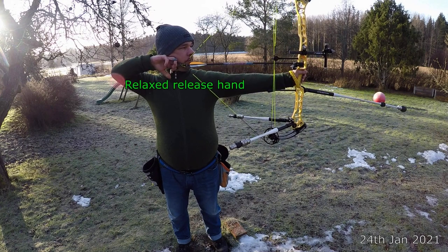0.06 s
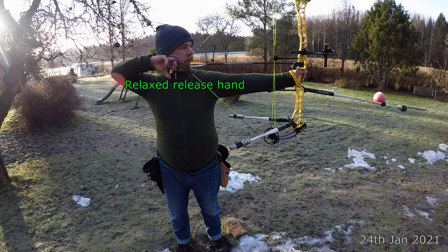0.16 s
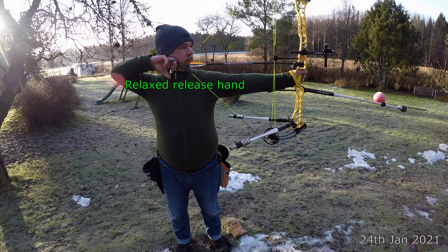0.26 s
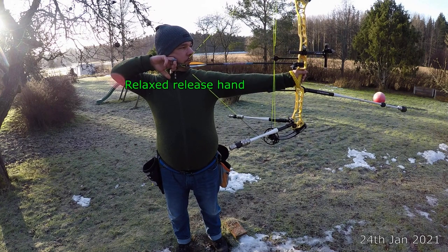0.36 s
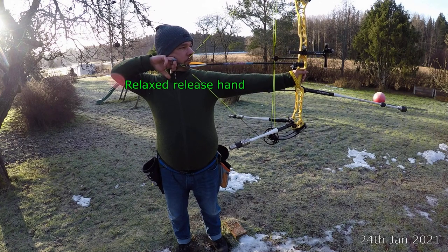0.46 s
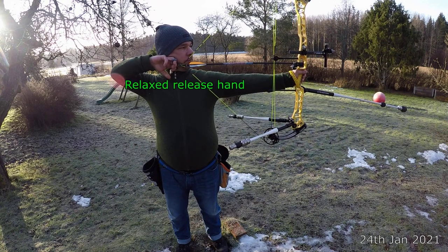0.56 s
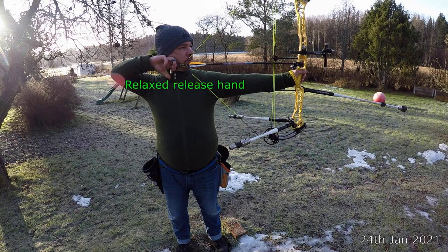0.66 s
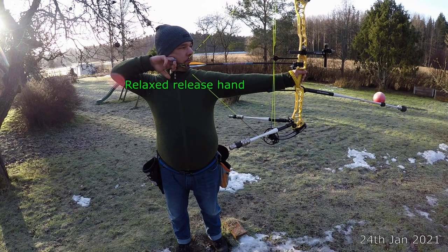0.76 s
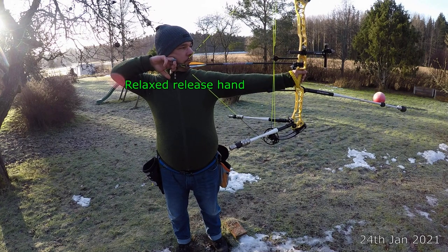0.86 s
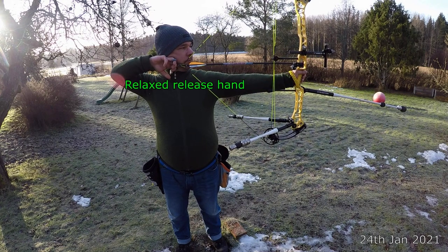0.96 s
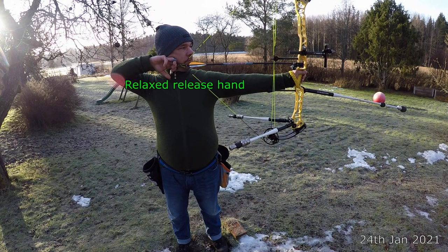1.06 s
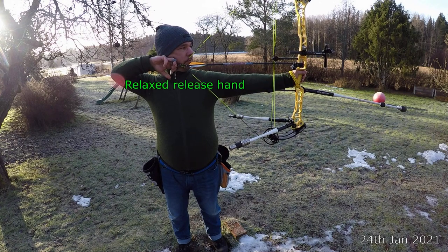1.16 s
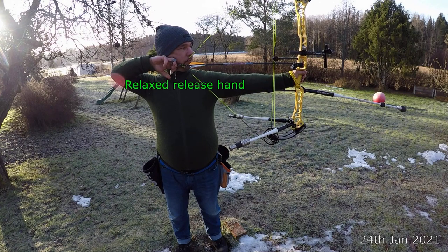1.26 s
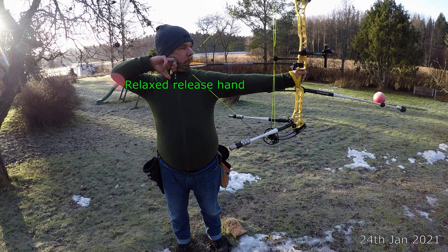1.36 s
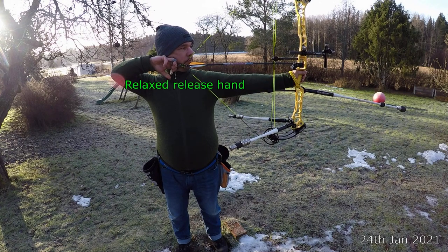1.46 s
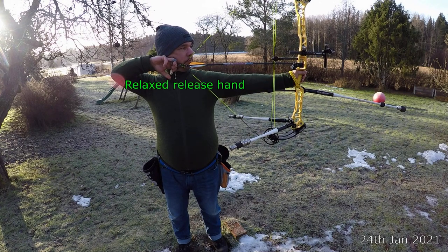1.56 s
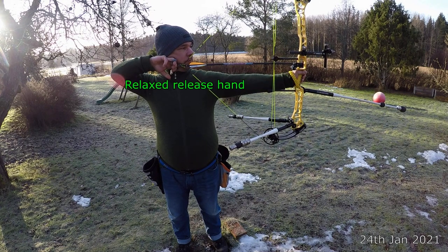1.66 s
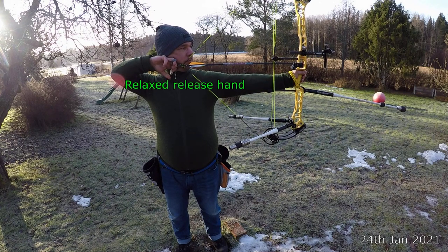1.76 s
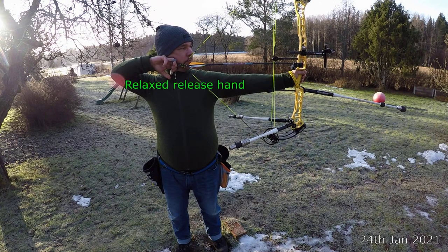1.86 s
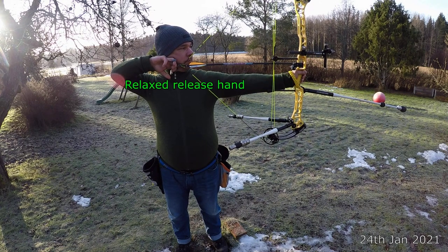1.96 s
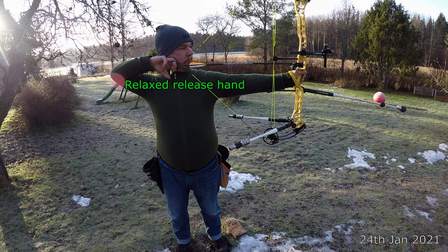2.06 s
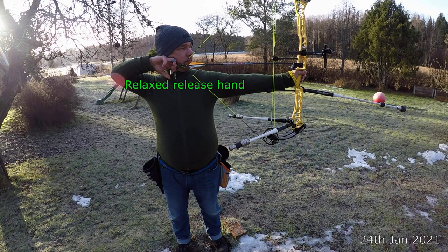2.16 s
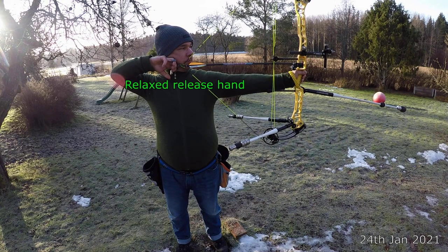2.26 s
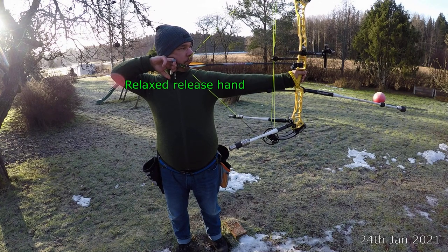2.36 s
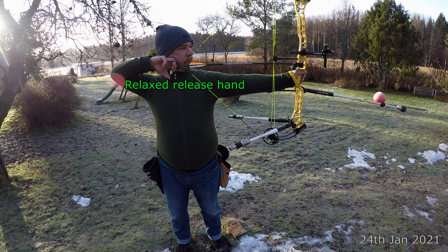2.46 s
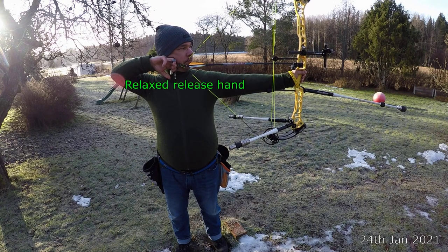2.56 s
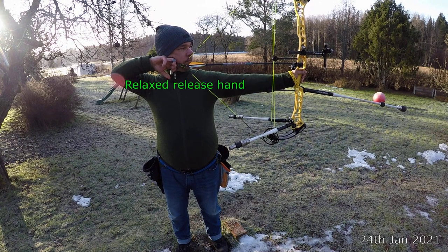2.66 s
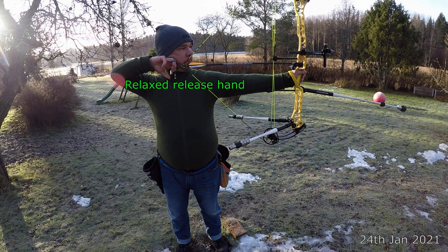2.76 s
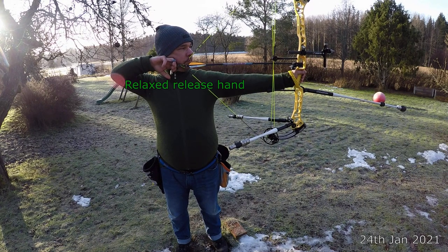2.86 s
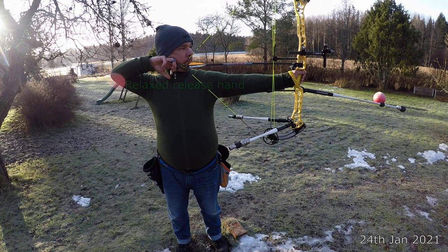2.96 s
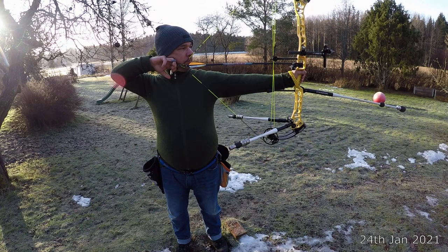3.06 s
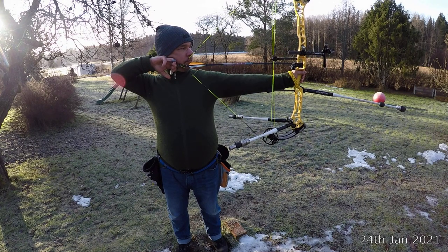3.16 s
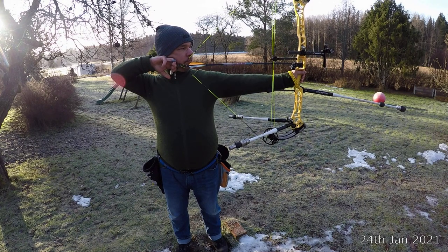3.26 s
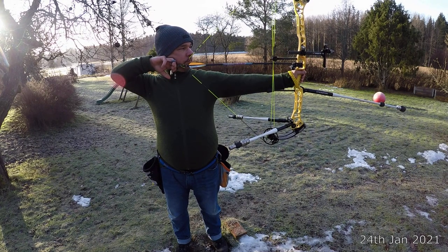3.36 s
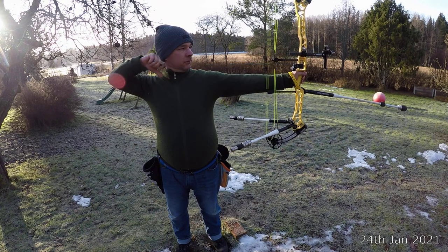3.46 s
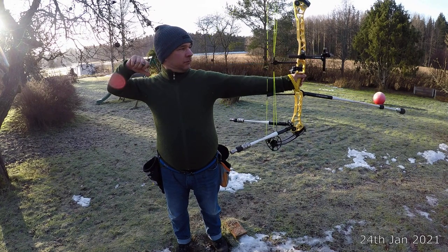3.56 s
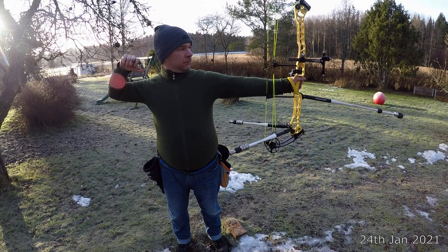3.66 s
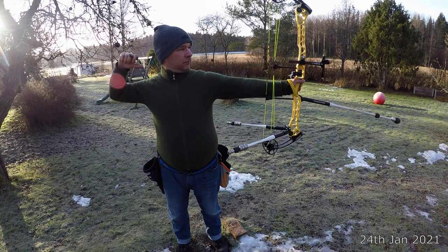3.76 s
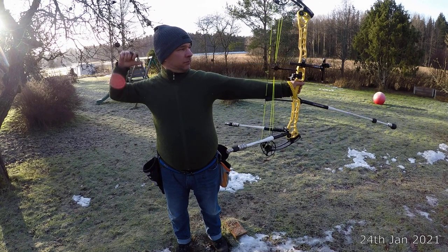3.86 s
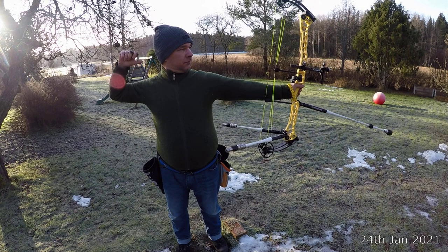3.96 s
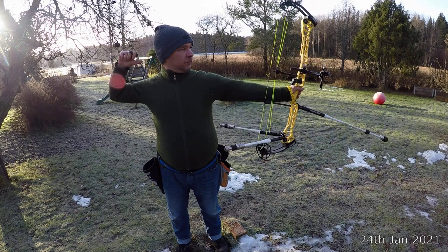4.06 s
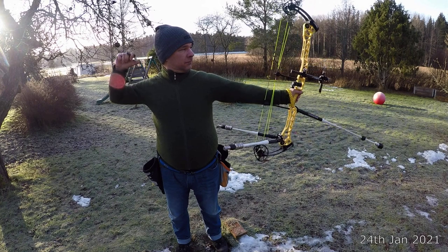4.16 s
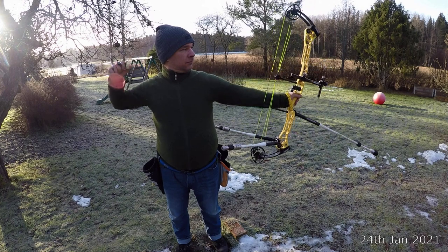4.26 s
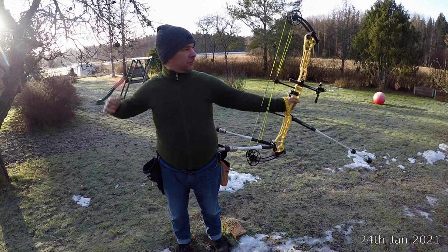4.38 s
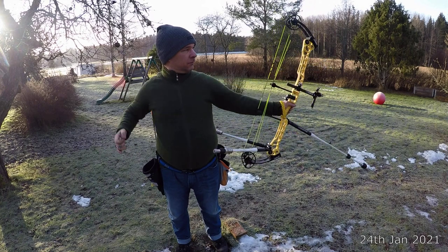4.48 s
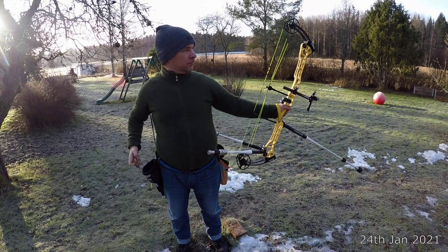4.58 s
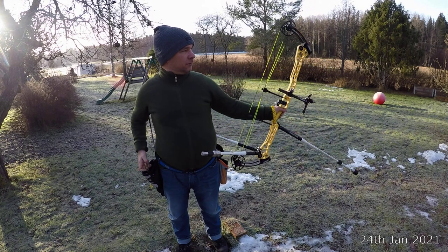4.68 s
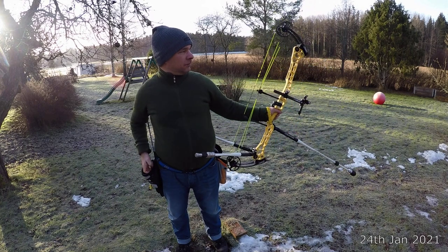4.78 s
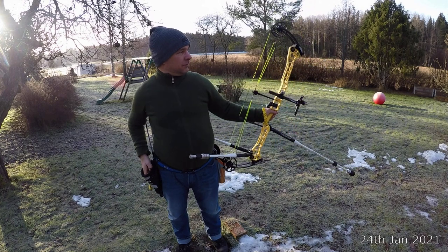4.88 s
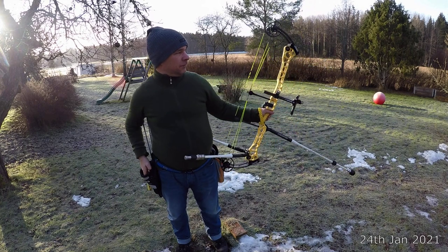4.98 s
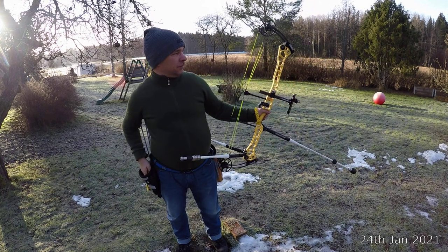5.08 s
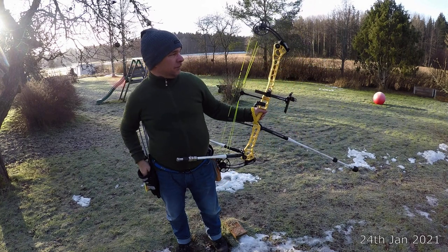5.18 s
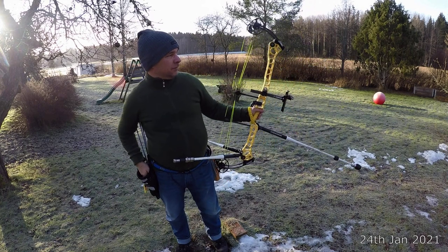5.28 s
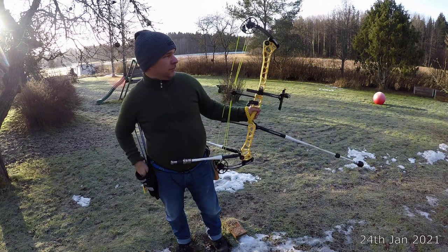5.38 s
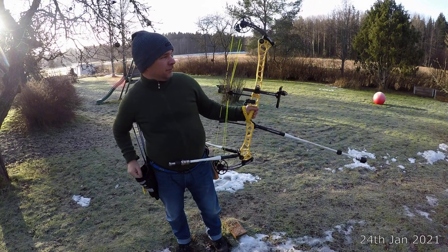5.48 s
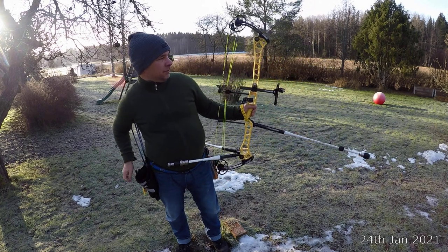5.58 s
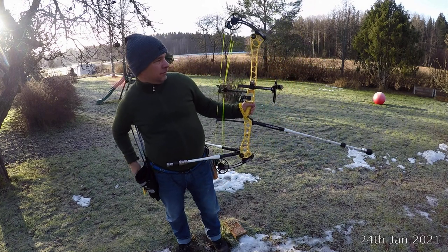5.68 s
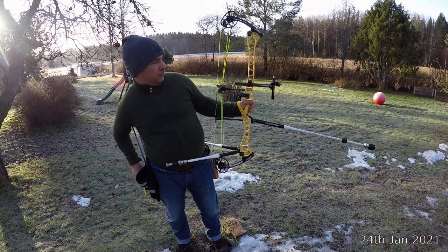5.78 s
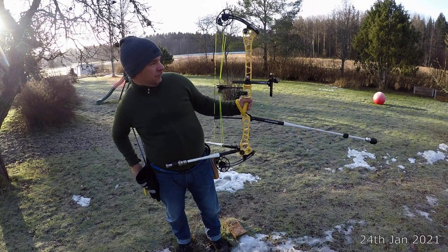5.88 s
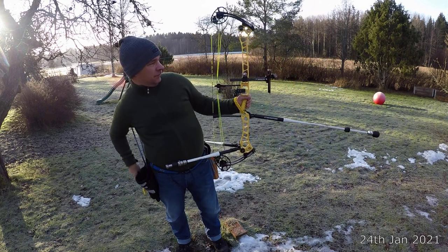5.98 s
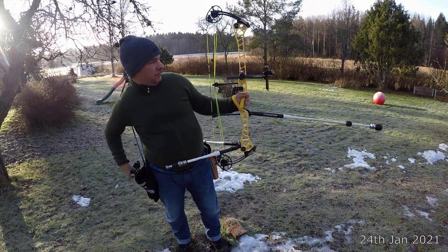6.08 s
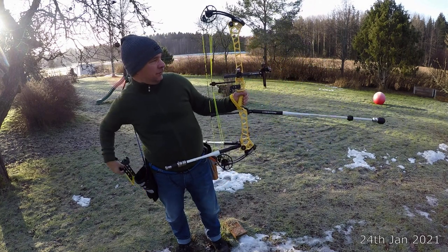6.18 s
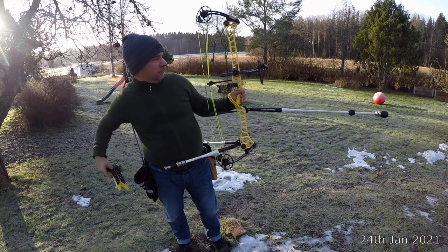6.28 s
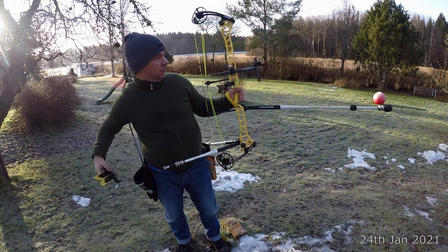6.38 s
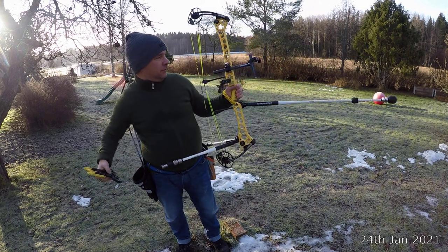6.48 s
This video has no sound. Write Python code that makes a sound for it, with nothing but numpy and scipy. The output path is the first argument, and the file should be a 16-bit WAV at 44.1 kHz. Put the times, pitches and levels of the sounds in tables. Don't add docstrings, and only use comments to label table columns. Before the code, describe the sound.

A close stereo camera microphone in an open garden hears soft hiss and far road hum. A faint rattling bird trill comes first, then a crisp metallic click and a pause. A bowstring snaps explosively, its limbs thumping and echoes scattering, followed by a duller, weaker arrow impact. A bird's rapid, raspy chatter slows into separate notes, with small shuffles and one sharp tick near the end.

```python
import sys
import numpy as np
from scipy import signal
from scipy.fft import rfft, irfft
from scipy.io import wavfile
from scipy.ndimage import uniform_filter1d

SR = 44100
rng = np.random.default_rng(int(sys.argv[2]) if len(sys.argv) > 2 else 0)


def inscribe(sig):
    pcm = np.round(np.clip(np.atleast_2d(sig).T, -1, 1) * 32767)
    wavfile.write(sys.argv[1], SR, pcm.astype(np.int16))


def nominal_scale(level):
    x = np.asarray(level, float) / 20
    return 10 ** x


N = 287973

# (frequency [Hz], density [dB per Hz])
TRAFFIC_MID = [(12, -71), (20, -35), (75, -31), (103, -34), (112, -67), (127, -14), (156, -0.5),
               (332, -11.5), (427, -13), (561, -15), (706, -17), (871, -15.5), (3000, -26.5), (3900, -33),
               (6600, -120)]
# (frequency [Hz], density [dB per Hz])
TRAFFIC_SIDE = [(12, -68), (20, -40), (43, -24), (81, -39), (107, -25), (129, -11), (156, 2), (318, -4),
                (354, -2.5), (516, -4.5), (853, -4), (988, -5), (3000, -23), (3900, -62), (6600, -120)]
# (frequency [Hz], density [dB per Hz])
HISS = [(1760, -60), (3000, -14), (3470, -4.5), (3740, -5.5), (4120, -5), (4480, -5.5), (5100, -8),
        (5470, -1), (5660, -0.5), (6320, -4.5), (8040, -6), (8680, -4.5), (12600, -16), (14700, -23.5),
        (15600, -11.5)]
# (frequency [Hz], left over right [dB])
HISS_SIDES = [(60, 18), (150, -2.5), (380, -0.5), (950, 0), (2380, 5.5), (5980, -4.5), (15000, -0.5)]
# (frequency [Hz], width [Hz], rms [dB], left over right [dB])
WHINE = [(5720, 140, -75.5, -17)]

# (first note [s], trill gap [s], gap growth [ratio per note])
BOUTS = [
    (1.556, .0432, 1.119),
    (3.559, .0458, 1.0835),
]
# (first rms [dB], swell [dB per note], throat [Hz])
BOUT_VOICES = [
    (-63.5, 0.38, 4130),
    (-55, -0.0859, 4030),
]
SLOWING_NOTES = (7, 10)
# (middle [s], rms [dB], length [s], throat [Hz])
LOOSE_NOTES = [(1.559, -58, .03, 4500), (4.792, -47.5, .045, 4500), (4.863, -50.5, .045, 4380),
               (4.926, -49.5, .045, 4440), (5.012, -51, .05, 4410), (5.136, -55, .05, 4900),
               (5.227, -50.5, .037, 4600), (5.29, -51, .037, 4300), (5.356, -51.5, .045, 4270),
               (5.425, -52.5, .033, 4170), (5.506, -53, .033, 4300), (5.577, -51, .033, 4210),
               (5.651, -55.5, .036, 4400)]
TRILL_NOTES = 10

# (time [s], peak [dB], contact [s], brightness [dB per octave])
RELEASE = [
    (2.262, -12, .0025, 0),
    (2.2662, -27, .002, 0),
    (2.2715, -38, .003, 3),
    (2.278, -45, .004, 2),
    (3.4108, -13, .003, 3),
]
# (time [s], peak [dB], contact [s], brightness [dB per octave])
TICKS = [
    (3.606, -48, 0.0037, -1),
    (4.239, -50, 0.0028, 6),
    (4.263, -55, 0.003, 5),
    (4.439, -44, 0.0033, 8),
    (6.1706, -39, 0.0019, 6),
]
# (time [s], peak [dB], length [s], frequency [Hz], width [Hz])
BROAD_RINGS = [(3.027, -48, .019, 1050, 60), (3.076, -52, .036, 1250, 100), (3.411, -24, .003, 2500, 340),
               (3.4112, -17, .003, 7700, 500), (4.436, -47, .005, 5500, 600), (4.436, -44, .009, 7100, 1000),
               (5.091, -46, .006, 7100, 1000), (5.469, -42, .026, 330, 400), (5.711, -42, .019, 278, 350),
               (5.915, -51, .012, 4800, 3000), (5.946, -44, .018, 252, 300), (6.02, -54, .022, 5600, 1500),
               (6.06, -58, .063, 2000, 1500), (6.08, -50, .07, 5800, 2480), (6.166, -46, .028, 400, 400),
               (6.1701, -37, .003, 1250, 1400), (6.1701, -41, .003, 5200, 1200),
               (6.1701, -42, .003, 2400, 2500), (6.1743, -41, .006, 1000, 1200)]
# (frequency [Hz], level [dB], t60 [s], left over right [dB])
AID_MODES = [(505, -19, .025, 0), (1370, -24, .008, 0), (2500, -36, .012, .5), (3100, -16, .02, .5),
             (3680, 1.5, .014, .5), (5900, -1, .016, 3), (6730, -7, .018, 3), (7330, -2, .014, 3),
             (8900, -13, .005, -3), (9600, -10, .005, -3), (11800, -13, .006, 0.1), (14500, -21, .004, 0.1)]

# (frequency [Hz], density [dB per Hz])
RUSH = [(470, -25), (800, 2.5), (1680, 1.5), (2180, 0), (3020, 1), (4430, -21), (6840, 0), (8980, -15),
        (15500, -30)]
# (time [s], gain [ratio])
RUSH_SWING = [(0, 0.69), (.003, 0.21), (.016, 0.86), (.042, 1.0), (.05, 0.1)]
# (time [s], peak [dB], contact [s], brightness [dB per octave])
SLAPS = [
    (3.4265, -15, 0.0048, -28),
    (3.4304, -10, .002, 2),
    (3.4318, -23, 0.0028, 11),
    (3.4356, -14, 0.0024, -7),
    (3.4407, -22, 0.0028, -3),
    (3.445, -27, .003, 7),
    (3.448, -38, .004, 20),
]
# (frequency [Hz], level [dB], t60 [s], left over right [dB])
STOP_MODES = [(3580, 0.5, 0.0054, 0), (4450, 0, 0.0055, -1), (5170, -1, 0.0049, 3), (5740, -2.5, .006, 7),
              (6800, -6, 0.0055, 11), (9900, -17.5, 0.0068, -5), (13400, -31, .003, 1.2)]
# (frequency [Hz], level [dB], t60 [s], left over right [dB])
BOW_MODES = [(356, 2.5, 0.063, -3), (513, -8, 0.17, -0.5), (600, -3.5, 0.17, -9), (749, -5.5, 0.16, -15),
             (802, -0.5, 0.14, -6), (1075, -12, 0.25, -8), (1260, -19, 0.071, 1), (1440, -7, 0.084, -7),
             (1900, -10, 0.072, 7), (2520, -17, 0.087, 3), (3760, -6, 0.055, .5)]
# (frequency [Hz], density [dB per Hz])
SHOT_TAIL = [(120, -44), (210, -7), (555, -2), (1180, -7.5), (1490, -8.5), (2340, -12), (3810, -23),
             (5080, -21), (6080, -13.5), (13900, -56), (15500, -71)]
# (frequency [Hz], left over right [dB])
SHOT_SIDES = [(60, 0.0), (180, 7), (550, -5), (1650, -0.5), (4970, -0.5), (15000, -7)]
# (frequency [Hz], t60 [s])
SHOT_T60 = [(150, 0.41), (600, 0.27), (2000, 0.29), (5000, 0.42), (12000, 0.33)]
FAR_T60 = [(200, 0.59), (1000, 1.0), (6000, 1.0)]

# (time [s], peak [dB], length [s], first pitch [Hz], last pitch [Hz])
HEAVES = [
    (3.4302, -22, .004, 330, 300),
    (3.444, -20.5, .03, 290, 400),
    (3.7216, -26, .004, 760, 720),
    (3.4313, -14, .02, 175, 195),
    (3.7222, -22.5, .025, 260, 140),
    (3.7445, -36, .024, 160, 150),
]
# (frequency [Hz], left over right [dB])
HEAVE_SIDES = [(340, -1.7), (800, -11)]

# (frequency [Hz], density [dB per Hz])
KNOCK = [(240, -31), (400, 5), (2550, -4.5), (4420, -3), (6280, -1), (7670, -7.5), (12100, -8),
         (15500, -29)]
# (frequency [Hz], density [dB per Hz])
KNOCK_TAIL = [(240, -2.5), (400, -3), (1260, -7.5), (3510, -12), (5480, -14), (8030, -21.5), (12300, -24),
              (15500, -58)]
# (frequency [Hz], left over right [dB])
KNOCK_SIDES = [(300, -5), (800, -14), (4000, -19), (8000, 4)]
KNOCK_TAIL_SIDES = [(300, 3), (1500, -7), (8000, -3)]
# (frequency [Hz], t60 [s])
KNOCK_T60 = [(200, 0.52), (1000, 0.19), (5000, 0.29), (12000, 0.36)]
# (frequency [Hz], likeness [ratio])
LIKENESS = [(200, 1), (700, 0.98), (2000, 0.95), (4200, 1), (6500, 0.45), (11000, 0.054)]


def rms_one(x):
    return x / np.sqrt(np.mean(x ** 2) + 1e-20)


def at_hz(points, hz):
    f, value = np.transpose(points)
    return np.interp(np.log(np.maximum(hz, 1)), np.log(f), value)


def sides(left_right_db):
    return nominal_scale(np.multiply.outer([.5, -.5], np.atleast_1d(left_right_db)))


def add(out, at_s, sound):
    at = int(round(at_s * SR))
    out[:, at:at + sound.shape[1]] += sound[:, :N - at]


def pair_noise(count, alike):
    mid, side = rng.standard_normal((2, count))
    alike = np.clip(alike, -1, 1)
    shared = np.sqrt(.5 + .5 * alike) * mid
    opposed = np.sqrt(.5 - .5 * alike) * side * [[1], [-1]]
    return shared + opposed


def coloured(x, spectrum, balance=((1, 0), (2, 0))):
    hz = np.fft.rfftfreq(x.shape[1], 1 / SR)
    gain = nominal_scale(at_hz(spectrum, hz)) * sides(at_hz(balance, hz))
    return rms_one(irfft(rfft(x) * gain, x.shape[1]))


def hump(length_s, size=4096):
    place = np.clip(np.arange(size) / (length_s * SR), 0, 1)
    return np.sin(np.pi * place) ** 2


def ring(x, hz, t60):
    r = nominal_scale(-60 / (t60 * SR))
    w = 2 * np.pi * hz / SR
    return signal.lfilter([0, np.sin(w)], [1, -2 * r * np.cos(w), r * r], x + 1e-18)


def strike(contact_s, peak_db, modes, tilt_db=0, size=4096):
    sound = 0
    for hz, db, t60, pan_db in modes:
        rattle = np.diff(pair_noise(size + 1, at_hz(LIKENESS, hz)))
        push = rattle * hump(contact_s, size=size) ** .5
        mode = ring(ring(push, hz, 4 / hz), hz, t60)
        mode = mode / np.abs(mode).max(axis=1, keepdims=True)
        sound = sound + nominal_scale(db + tilt_db * np.log2(hz / 4000)) * sides(pan_db) * mode
    return nominal_scale(peak_db) * sound


def dying_noise(level_db, spectrum, balance, t60_table, rise_s, alike, size=26000):
    noise = coloured(pair_noise(size, alike), spectrum, balance)
    t = np.arange(size) / SR
    ragged = nominal_scale(1.8 * rms_one(uniform_filter1d(rng.standard_normal(size), 150)))
    out = 0
    for hz in 2.0 ** np.arange(7, 15):
        edges = [hz / np.sqrt(2), min(hz * np.sqrt(2), SR * .45)]
        band = signal.butter(2, edges, "band", fs=SR, output="sos")
        out = out + signal.sosfilt(band, noise) * nominal_scale(-60 * t / at_hz(t60_table, hz))
    return nominal_scale(level_db) * out * ragged * np.minimum(t / rise_s, 1)


def air():
    mid = coloured(pair_noise(N, 1), TRAFFIC_MID)
    side = coloured(pair_noise(N, -1), TRAFFIC_SIDE)
    out = nominal_scale(-53) * (mid + nominal_scale(4.0) * side)
    out += nominal_scale(-62 + 3.0) * coloured(pair_noise(N, 0.053), HISS, HISS_SIDES)
    for hz, width_hz, db, pan_db in WHINE:
        out += nominal_scale(db) * sides(pan_db) * rms_one(ring(pair_noise(N, 0.091), hz, 7.8 / width_hz))
    return out


def chatter():
    notes = []
    for (first_s, gap_s, growth), (db, swell_db, throat_hz), slowing in zip(BOUTS, BOUT_VOICES, SLOWING_NOTES):
        count = np.arange(TRILL_NOTES + slowing)
        gaps = gap_s * growth ** np.maximum(count - TRILL_NOTES + 1, 0)
        effort = np.log2(gaps / gap_s)
        level_db = db + swell_db * np.minimum(count, TRILL_NOTES) + 6 * effort
        level_db = level_db + 2.2 * rng.standard_normal(len(gaps))
        middle_s = first_s + np.cumsum(gaps) - gap_s
        notes += zip(middle_s, level_db, .55 * gaps, throat_hz + 488 * effort)
    return notes + LOOSE_NOTES


def bird(out):
    partial = np.arange(5, 15)[:, None]
    notes = chatter()
    for (s, db, length_s, throat_hz), (wobble, skew) in zip(notes, rng.standard_normal((len(notes), 2))):
        place = np.clip(np.arange(4096) / (length_s * SR), 0, 1) - .5
        arch = 1 - .75 * np.abs(place - 0.083) ** 1.8
        rate = throat_hz / 9 * (1 + .01 * wobble) * arch
        rate = rate * (1 + .012 * rms_one(uniform_filter1d(rng.standard_normal(4096), 120)))
        hz = partial * rate
        throat = np.exp(-((hz - throat_hz * arch) / 680) ** 2)
        throat = throat + 0.28 * np.exp(-.5 * ((hz - 6400) / 350) ** 2)
        phase = partial * 2 * np.pi * np.cumsum(rate) / SR + 0.72 * partial ** 2 + skew
        buzz = (throat * np.sin(phase)).sum(axis=0)
        rasp = ring(pair_noise(4096, 0.91), throat_hz, 0.0017)
        note = (buzz + .5 * rms_one(rasp)) * hump(length_s) ** .7
        note = note + .15 * np.roll(note[::-1], 800, axis=1)
        add(out, s - length_s / 2, nominal_scale(db - 2.0) * sides(-5) * note)


def metal_clicks(out, events):
    for s, db, contact_s, tilt_db in events:
        add(out, s, strike(contact_s, db - 5.0, AID_MODES, tilt_db))


def release_aid(out):
    metal_clicks(out, RELEASE)


def broad_rings(out):
    for s, db, length_s, hz, width_hz in BROAD_RINGS:
        add(out, s, strike(length_s, db, [(hz, 0, 3.4 / width_hz, 0)]))


def string_rush(out):
    time_s, gain = np.transpose(RUSH_SWING)
    swing = np.interp(np.arange(4096) / SR, time_s, gain)
    add(out, 3.411, nominal_scale(-26.5) * coloured(pair_noise(4096, 0.81), RUSH, SHOT_SIDES) * swing)


def stop_slaps(out):
    for s, db, contact_s, tilt_db in SLAPS:
        add(out, s, strike(contact_s, db, STOP_MODES, tilt_db))


def garden_echo(out):
    add(out, 3.43, dying_noise(-16.5, SHOT_TAIL, SHOT_SIDES, SHOT_T60, rise_s=0.0032, alike=0.44))
    add(out, 3.47, dying_noise(-39, SHOT_TAIL, SHOT_SIDES, FAR_T60, rise_s=.05, alike=.1))


def heaves(out):
    for s, db, length_s, first_hz, last_hz in HEAVES:
        hz = np.interp(np.arange(4096) / SR, [0, length_s], [first_hz, last_hz])
        swing = np.sin(2 * np.pi * np.cumsum(hz) / SR) * np.sqrt(hump(length_s))
        add(out, s, nominal_scale(db) * sides(at_hz(HEAVE_SIDES, first_hz)) * swing)


def bow_ring(out):
    add(out, 3.431, strike(.05, -26.5, BOW_MODES, size=20000))


def belt_ticks(out):
    metal_clicks(out, TICKS)


def target(out):
    crack = coloured(pair_noise(4096, 0.65), KNOCK, KNOCK_SIDES) * hump(0.0022) ** .5
    add(out, 3.719, nominal_scale(-21.5) * crack)
    add(out, 3.72, dying_noise(-30, KNOCK_TAIL, KNOCK_TAIL_SIDES, KNOCK_T60, rise_s=0.0019, alike=0.22))


def scene():
    near, heavy = np.zeros((2, 2, N)) + 1e-18
    for source in (bird, release_aid, broad_rings, string_rush, stop_slaps, garden_echo, bow_ring, belt_ticks, target):
        source(near)
    heaves(heavy)
    wind_cut = signal.butter(4, 120, "high", fs=SR, output="sos")
    return signal.sosfilt(wind_cut, near) + signal.sosfiltfilt(wind_cut, heavy) + air()


def band_limit(x):
    return signal.sosfilt(signal.butter(12, 16530, fs=SR, output="sos"), x)


def record(dry):
    top_cut = signal.butter(8, 15700, fs=SR, output="sos")
    mix = signal.sosfilt(top_cut, dry)
    return band_limit(mix)


dry = scene()
out = record(dry)
inscribe(out)
```